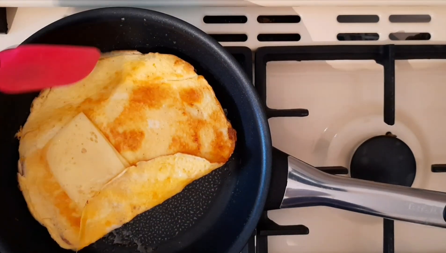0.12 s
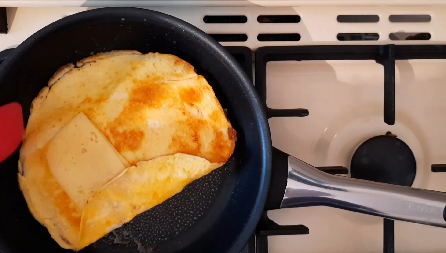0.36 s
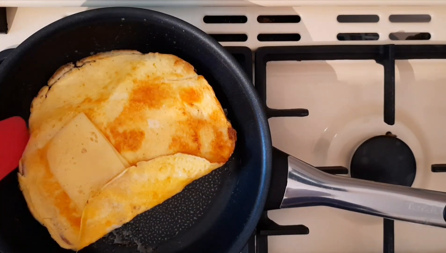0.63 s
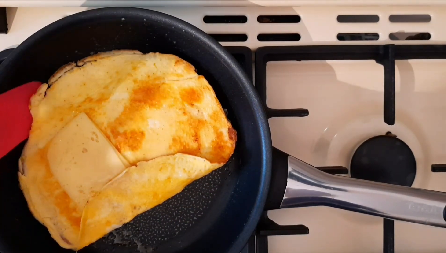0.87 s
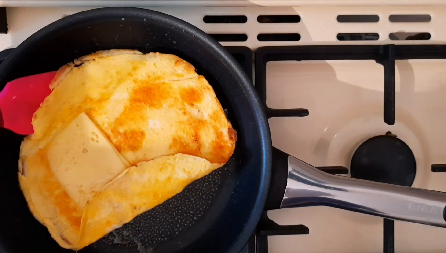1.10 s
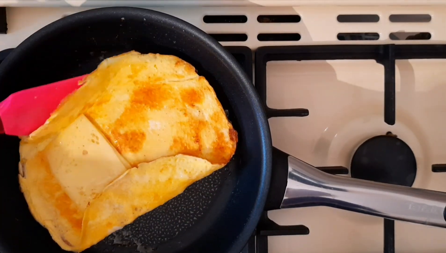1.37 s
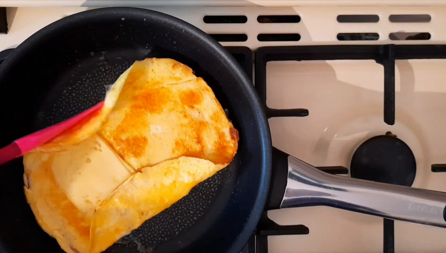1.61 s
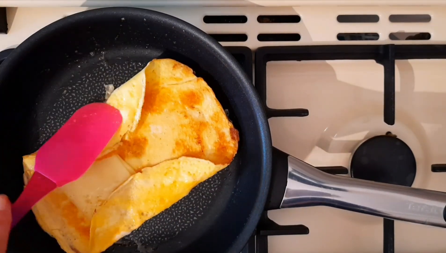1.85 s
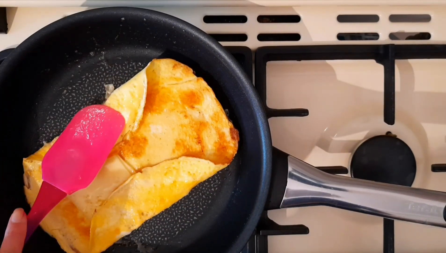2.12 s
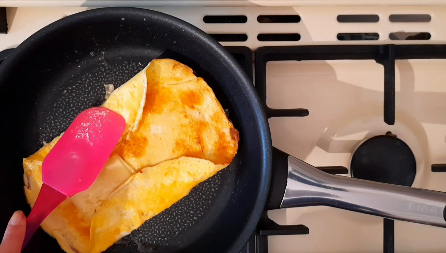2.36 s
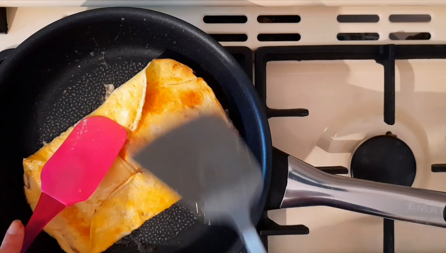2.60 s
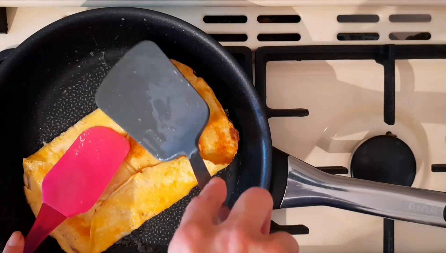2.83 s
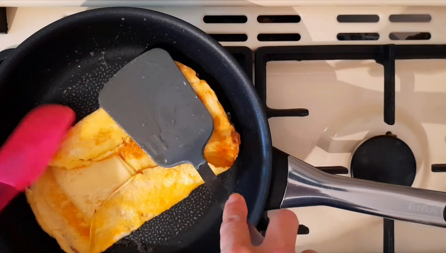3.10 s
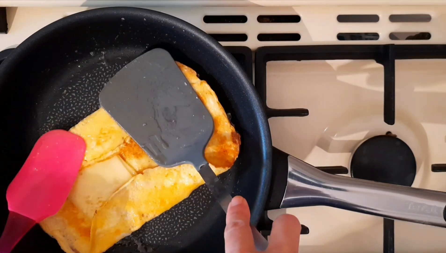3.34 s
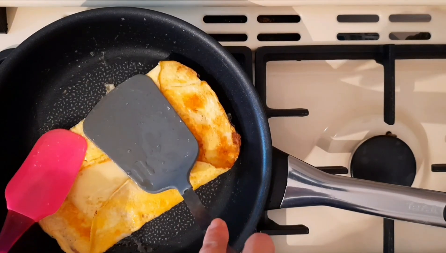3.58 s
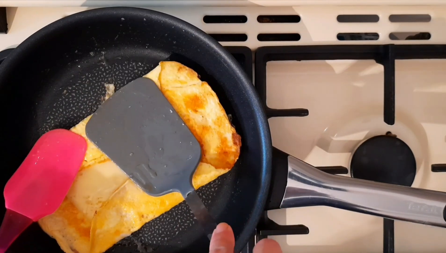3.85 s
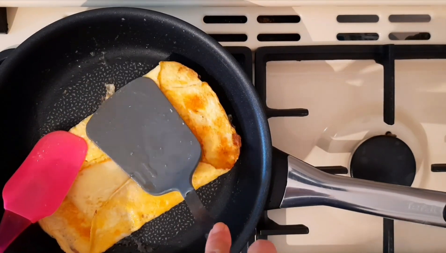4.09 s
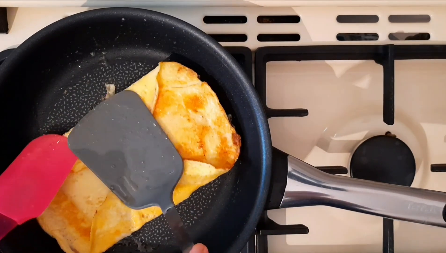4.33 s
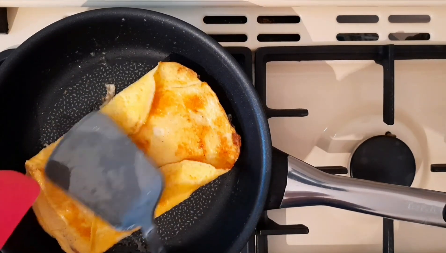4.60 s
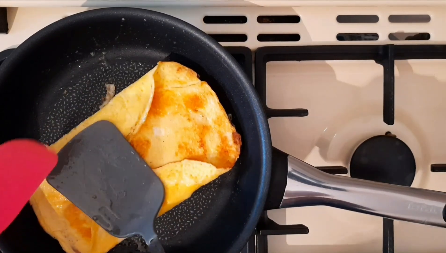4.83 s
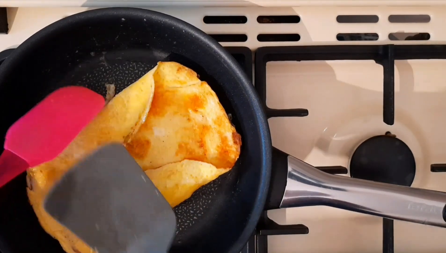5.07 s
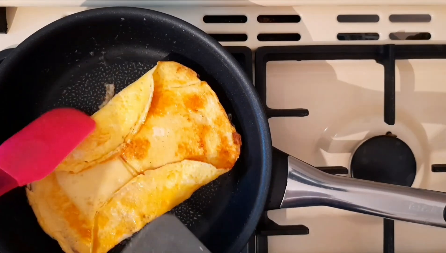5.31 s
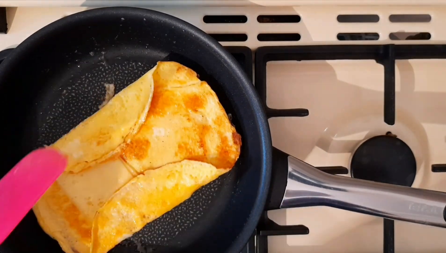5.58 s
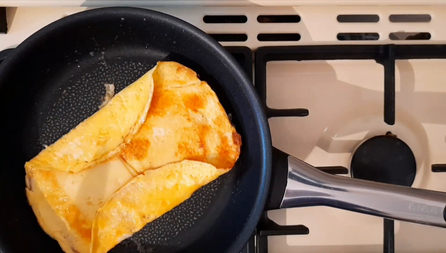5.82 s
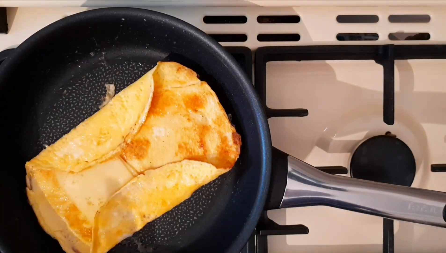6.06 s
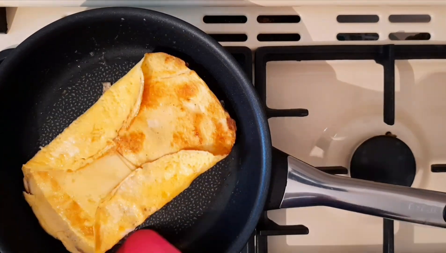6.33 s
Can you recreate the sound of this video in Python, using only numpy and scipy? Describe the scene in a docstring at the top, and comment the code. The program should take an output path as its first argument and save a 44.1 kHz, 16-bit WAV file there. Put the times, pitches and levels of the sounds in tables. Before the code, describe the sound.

Close from above, egg bread fries faintly in a nonstick pan: fine high hiss, tiny crackles and sharp spits. A soft silicone spatula taps and drags dully. Just after two seconds a hard utensil clatters on the stove and strikes the pan rim, which rings briefly. Sizzle and pops continue, slightly stronger, until a second, duller clatter and short bright scrapes near the end. Hard small kitchen, soft low hush, thin high whine.

```python
"""A faint sizzle comes first, with sharp fat spits and soft spatula taps: egg bread in a nonstick pan.
Filtered noise and tiny damped sines make the sizzle; each spit is a damped sine trailed by weaker droplets.
Utensils tick, scrape and clatter as noise contacts that drive damped modes of tool, pan and stove body.
A thin high whine (a drifting sine) and a soft room hush (low noise) lie under it all.
It is heard from above by two close microphone ports in a hard kitchen."""
import sys
import numpy as np
from scipy import signal
from scipy.fft import rfft, irfft, next_fast_len
from scipy.io import wavfile
from scipy.ndimage import map_coordinates

SR = 44100
rng = np.random.default_rng(int(sys.argv[2]) if len(sys.argv) > 2 else 0)


def ratio_of_db(decibels):
    """Turn decibels (scalar or array-like) into linear amplitude factors; 0 dB maps to 1."""
    return 10 ** (np.asarray(decibels, float) / 20)


def unload_audio(sound):
    """Save the sound as a 16-bit wav file, at the path given as the first command line argument."""
    columns = np.transpose(np.atleast_2d(sound))
    # keep every value between -1 and 1, then stretch to whole-number steps
    steps = np.round(np.clip(columns, -1, 1) * 32767)
    wavfile.write(sys.argv[1], SR, steps.astype(np.int16))


N = 284004  # samples


def unit(x):
    """Scaled to rms 1."""
    return x / np.sqrt(np.mean(x ** 2) + 1e-20)


def along(points, hz):
    """Reads (Hz, value) points on a log frequency axis."""
    f, v = np.transpose(points)
    return np.interp(np.log(hz + 1), np.log(f + 1), v)


def curves(rows):
    """One value per sample for each column after the time."""
    s, *cols = np.transpose(rows)
    return [np.interp(np.arange(N) / SR, s, c) for c in cols]


def wobble(rate):
    """A smooth random curve with rate knots a second, updated every 64 samples."""
    knots = rng.standard_normal(int(N * rate / SR) + 4)
    coarse = map_coordinates(knots, [np.arange(0, N, 64) * rate / SR])
    return np.repeat(coarse, 64)[:N]


def filtered(x, response):
    """x shaped by a complex response of frequency."""
    n = x.shape[-1]
    m = next_fast_len(n + 4096)
    return irfft(rfft(x, m) * response(np.fft.rfftfreq(m, 1 / SR)), m)[..., :n]


def coloured(n, spectrum):
    """Noise of rms 1 with the given spectrum."""
    return unit(filtered(rng.standard_normal(n), lambda hz: ratio_of_db(along(spectrum, hz))))


def ports(x, lag_ms, pan_db):
    """The left port hears lag_ms later and pan_db louder than the right."""
    sides = np.array([[.5], [-.5]])
    return filtered(x, lambda hz: ratio_of_db(sides * pan_db) * np.exp(-2j * np.pi * hz * sides * lag_ms / 1000))


def mid_side_shares(alike, hz):
    """Mid and side strengths that give two ports the wanted likeness."""
    turn = np.arccos(np.clip(along(alike, hz), 0, 1)) / 2
    return np.array([np.cos(turn), np.sin(turn)])


def paired(pair, alike):
    """Two unrelated noises mixed to the given left-right likeness."""
    mid, side = filtered(pair, lambda hz: mid_side_shares(alike, hz))
    return np.array([mid + side, mid - side])


# left-right likeness of diffuse noise: pitch_hz [Hz], likeness [0-1]
NOISE_LIKENESS = [(60, 0.8), (200, 0.13), (800, 0.81), (2500, 0.01), (6000, 0), (13000, 0.11)]


def stereo_noise(spectrum):
    """Diffuse noise of rms 1, partly alike at the two ports."""
    def shape(hz):
        """Mid and side shares of the spectrum."""
        return ratio_of_db(along(spectrum, hz)) * mid_side_shares(NOISE_LIKENESS, hz)
    mid, side = filtered(rng.standard_normal((2, N)), shape)
    return unit(np.array([mid + side, mid - side]))


# left-right likeness of the echoes: pitch_hz [Hz], likeness [0-1]
ECHO_LIKENESS = [(150, 0.98), (500, 0.77), (1500, 0.029), (5000, 0.2)]
# kitchen decay: pitch_hz [Hz], t60_s [s]
KITCHEN_DECAY = [(100, 0.29), (500, 0.37), (2000, 0.34), (4000, 0.28), (14000, 0.32)]


def kitchen(x, room_db):
    """A fresh echo tail of the kitchen, each frequency dying at its own speed."""
    noise = paired(rng.standard_normal((2, round(.33 * SR))), ECHO_LIKENESS)
    hz, t, bins = signal.stft(noise, SR, nperseg=256)
    decay = ratio_of_db(-60 * t / along(KITCHEN_DECAY, hz)[:, None])
    tail = signal.istft(bins * decay, SR, nperseg=256)[1]
    tail = tail / np.linalg.norm(tail[0])
    tail = np.pad(tail, ((0, 0), (round(.005 * SR), 0)))  # the first wall answers after 5 ms
    return ratio_of_db(room_db) * signal.oaconvolve(x[None], tail, axes=1)[:, :len(x)]


def heard(sound, lag_ms, pan_db, room_db):
    """Direct sound at the two ports plus its echoes."""
    return ports(sound, lag_ms, pan_db) + kitchen(sound, room_db)


def ringing(modes, t, scatter_db):
    """Damped modes, neighbours in opposite phase, struck at new strengths each time."""
    hz, db, t60 = np.transpose(modes)[:, :, None]
    chance = rng.standard_normal((len(modes), 1))
    sign = (-1.0) ** np.arange(len(modes))[:, None]
    level = ratio_of_db(db + scatter_db * chance - 60 * t / t60)
    return (sign * level * np.sin(2 * np.pi * hz * t)).sum(0)


def bursts(s, size, hz, cycles):
    """Bubbles bursting: a short damped sine each, falling to 1/e in so many cycles."""
    k = np.arange(96)  # samples in a burst
    phase = hz[:, None] * k / SR
    shapes = size[:, None] * np.exp(-phase / cycles) * np.sin(2 * np.pi * phase)
    places = (s * SR).astype(int)[:, None] + k
    return np.bincount(places.ravel(), shapes.ravel(), N + 200)[:N]


# high whine, drifting: start_s [s], pitch_hz [Hz], level_db [dB, before unsteadiness and pan]
WHINE_DRIFT = [(0, 13468, -67), (1.3, 13489, -70), (2.0, 13484, -71), (2.9, 13460, -71), (3.3, 13445, -65),
               (3.7, 13460, -76), (4.2, 13468, -73), (4.9, 13478, -70), (6.44, 13482, -69)]


def whine():
    """A thin high sine, slightly fuzzy in pitch and unsteady in strength, a little to the left."""
    hz, db = curves(WHINE_DRIFT)
    tone = np.sin(2 * np.pi * np.cumsum(hz + 12 * wobble(64)) / SR)
    level = np.sqrt(2) * ratio_of_db(db + 2.0 * wobble(5) + 1.4 * wobble(24))
    return level * tone * ratio_of_db([[1.2], [-1.2]])


# sizzle and hush level; the rises near 2.6 and 6.2 s are wash left ringing after the clatter:
# start_s [s], level_db [sizzle dB, before flutter and pan]
WASH_LEVEL = [(0, -62.5), (.2, -62), (.58, -58.5), (1.1, -61), (1.9, -62), (2.6, -55.5), (2.9, -61),
              (3.14, -58.5), (3.4, -58), (3.65, -55.5), (4.2, -56.5), (4.4, -58.5), (4.8, -58.5),
              (5.3, -61.5), (5.8, -60.5), (6.2, -55.5), (6.44, -61)]
# hush colour: pitch_hz [Hz], level_db [relative dB per Hz]
HUSH_COLOUR = [(18, -34), (30, -2), (55, 3), (142, 0), (220, -13.5), (296, -4), (334, -9), (369, -8.5),
               (459, -12.5), (670, -4.5), (1040, -11.5), (1610, -13), (1740, -2), (2090, -12.5),
               (3500, -15.5), (4550, -61.5), (7700, -120)]
HUSH_DB, HUSH_GROWS = -67, 1.18  # level at the average of the curve; dB of hush for each dB of sizzle


def hush():
    """Soft low noise that swells along the same level curve as the sizzle."""
    wash_db, = curves(WASH_LEVEL)
    swell_db = HUSH_GROWS * (wash_db - wash_db.mean())
    return ratio_of_db(HUSH_DB + swell_db + 0.082 * wobble(14)) * stereo_noise(HUSH_COLOUR)


# steam hiss colour: pitch_hz [Hz], level_db [relative dB per Hz]
SIZZLE_COLOUR = [(1470, -63), (2500, -48), (3160, -6), (3980, -2), (5920, 0), (10600, -1), (12700, 5),
                 (13000, -1), (13900, 5), (15600, -2), (16000, -65)]


def sizzle():
    """A fine hiss of steam with thousands of small bubbles; both follow one level curve."""
    draws = rng.random((3000, 3))  # moment, size and pitch of each bubble
    sizes = ratio_of_db(-2.0 * np.log(1 - draws[:, 1]))
    bubbles = unit(bursts(draws[:, 0] * N / SR, sizes, 6000 + 8500 * draws[:, 2], cycles=1.1))
    flutter = ratio_of_db(0.061 * wobble(4.5) + 1.78 * wobble(25))
    return ratio_of_db(curves(WASH_LEVEL)[0]) * flutter * (stereo_noise(SIZZLE_COLOUR) + ratio_of_db(-10.5) * bubbles)


FAINT_SPITS, FAINT_DB, FAINT_SPREAD_DB = 40, -44, 1.5  # count; least level at an average moment; random excess
FAINT_HZ = 11000  # scaled by 0.7 to 0.95 at random


def faint_spits():
    """Small spits at random moments, stronger where the level curve of the sizzle is higher."""
    s, size, pitch = rng.random((FAINT_SPITS, 3)).T
    s = s * (N - 1) / SR
    wash_db = np.interp(s, *np.transpose(WASH_LEVEL))
    db = FAINT_DB + wash_db - wash_db.mean() - FAINT_SPREAD_DB * np.log(1 - .9 * size)
    return np.transpose([s, db, FAINT_HZ * (0.7 + .25 * pitch)])


# loud fat spits: start_s [s], level_db [dB, before low cut and pan],
# pitch_hz [Hz, nominal: each pop takes 0.8 to 1.1 of it]
LOUD_SPITS = [(0.0503, -22, 7050), (0.0534, -21.5, 11200), (0.1615, -28.5, 11100), (0.5823, -26, 9250),
              (0.625, -30.5, 10000), (1.0969, -34, 12800), (2.0035, -30, 11300), (2.1796, -28.5, 10500),
              (2.1876, -31, 10700), (2.6504, -50, 12500), (2.8397, -34, 11400), (2.8863, -26, 13000),
              (3.0532, -28.5, 11800), (3.081, -23.5, 12400), (3.6147, -26, 12600), (3.8901, -17, 13200),
              (3.9062, -37, 11300), (4.6873, -30, 9100), (4.78, -37, 7000), (4.897, -34.5, 7000),
              (5.036, -33, 8040), (5.048, -35, 9100), (5.07, -40, 7500)]
SPIT_CUT_HZ = 2600  # a spit has little body below this


def spits():
    """Each spit is a sharp pop trailed by a few weaker droplets."""
    rows = np.vstack([LOUD_SPITS, faint_spits()])
    s, db, hz = np.transpose(rows)[:, :, None]
    draws = rng.random((len(rows), 2, 5))
    late = 0.012 * draws[:, 0] * (np.arange(5) > 0)  # seconds; the first pop is on time
    pitch = np.clip(hz * (0.8 + 0.3 * draws[:, 1]), 3000, 14000)
    start = np.minimum(s + late, (N - 1) / SR)
    size = ratio_of_db(db - 1500 * late)  # later droplets are weaker
    pops = bursts(start.ravel(), size.ravel(), pitch.ravel(), cycles=0.62)
    pops = filtered(pops, lambda f: (1j * f / (SPIT_CUT_HZ + 1j * f)) ** 2)
    return heard(pops, lag_ms=-0.206, pan_db=8.5, room_db=-6.5)


# soft spatula drags: start_s [s], end_s [s], dull_db [dB], brush_db [dB] (before fade, lumps and pan)
DRAGS = [(0.022, 0.17, -68, -105), (0.36, 0.444, -63, -84), (0.534, 0.725, -70, -69),
         (0.754, 0.95, -72, -63), (0.944, 1.09, -73, -67), (1.145, 1.332, -56.5, -100),
         (2.164, 2.3, -52.5, -44), (3.622, 3.74, -68.5, -66), (4.578, 4.697, -69.5, -72),
         (5.816, 5.97, -51.5, -76)]
# dull drag colour: pitch_hz [Hz], level_db [relative dB per Hz]
DRAG_COLOUR = [(59, -74), (100, -7), (192, 2), (245, -19), (295, 3), (514, -10), (908, 3), (1020, -38),
               (1330, -9), (3000, -28), (3900, -47.5), (6600, -120)]
# brighter brushing colour: pitch_hz [Hz], level_db [relative dB per Hz]
BRUSH_COLOUR = [(500, -38), (1000, -4.5), (1900, 4.5), (2800, 2), (3600, -2), (6000, -61)]
RUB_FADE_DB_PER_S = 30  # a drag loses pressure as it goes


def rubs():
    """The soft spatula drags along the pan: a dull, lumpy rush that starts fast, under a swelling brush."""
    t = np.arange(N) / SR
    shapes, swells = [], []
    for s, end, *_ in DRAGS:
        edges = np.clip(np.minimum((t - s) / 0.02, (end - t) / 0.033), 0, 1)  # stops when it lifts
        shapes.append(edges * ratio_of_db(-RUB_FADE_DB_PER_S * np.clip(t - s, 0, 1)))
        swells.append(np.sin(np.pi * np.clip((t - s) / (end - s), 0, 1) ** 0.83) ** 2)
    dull_db, brush_db = np.transpose(DRAGS)[2:]
    dull = ratio_of_db(dull_db) @ np.array(shapes) * ratio_of_db(2.4 * wobble(70)) * coloured(N, DRAG_COLOUR)
    lumps = ratio_of_db(2.3 * wobble(12) + 3.5 * wobble(90))
    return dull + ratio_of_db(brush_db) @ np.array(swells) * lumps * coloured(N, BRUSH_COLOUR)


# utensil modes: pitch_hz [Hz], level_db [relative dB, before scatter], t60_s [s]
TOOL_MODES = [(975, -9, .04), (1080, -3, 0.05), (1310, -3, 0.09), (1470, -3, .07), (1680, -7, .06),
              (1830, -9, .05), (2080, -6, .06), (2270, -5, 0.05), (2410, -1, 0.09), (2550, -7, .06),
              (2920, -8, .07), (3470, -3, 0.08), (3880, -2, 0.09), (4300, -7, .03), (4980, -5, 0.06),
              (5290, -4.5, 0.075), (5680, -10, .04), (6020, -9, 0.05), (6350, -8, .04), (6690, -10, .05),
              (7150, -7, .05), (7640, -7, 0.05), (8500, -7, 0.05), (9090, -8, .05), (9790, -8, .05),
              (10900, -5, .05)]
RING_OCTAVES, RING_CHATTER = 0.8, 0.69  # reach of a blow around its centre; re-excitation by the chatter


def struck(t, centre_hz, chatter):
    """The utensil's modes near the blow's centre, struck once and kept going by the chatter."""
    modes = []
    for hz, db, t60 in TOOL_MODES:
        distance = np.log2(hz / centre_hz) / RING_OCTAVES
        modes.append((hz, db - 6 * distance ** 2, t60))
    push = RING_CHATTER * chatter / np.linalg.norm(chatter)
    push[0] = 1
    return signal.oaconvolve(push, ringing(modes, t, scatter_db=2.0))[:len(t)]


# knock colour: pitch_hz [Hz], level_db [relative dB per Hz]
KNOCK_COLOUR = [(250, -6), (450, -8.5), (800, -5), (1300, -5), (2000, -8), (2600, -16), (3100, -19.5),
                (5000, -18), (8000, -48)]
# stove body modes: pitch_hz [Hz], level_db [relative dB, before tilt and scatter], t60_s [s]
STOVE_MODES = [(101, -6, 0.24), (144, 2.5, 0.15), (184, 1.5, 0.14), (206, -5, .11), (255, -6, .08),
               (326, -10, 0.09), (405, 1, 0.13)]
SNAP_DB, SNAP_S = -3.5, .00006  # the first instant of a contact, over the knock; its time constant
RATTLE_DB, RATTLE_PER_S = 3.5, 260  # a contact chatters instead of dying smoothly
THUD_RISE_S, CONTACT_RISE_S = .005, .0007


def clatter(blows, clinks, tilt_db):
    """Each blow clinks at the contact, knocks, booms in the stove and rings the utensil."""
    out = np.zeros(N + SR)
    t = np.arange(round(.25 * SR)) / SR
    knocks = coloured(N, KNOCK_COLOUR)
    # some spots stir the lowest modes less: tilt_db per octave below 190 Hz
    stove = [(hz, db + tilt_db * np.log2(min(hz, 190) / 190), t60) for hz, db, t60 in STOVE_MODES]
    snap = t / SNAP_S * (t / SNAP_S - 2) * np.exp(1 - t / SNAP_S)
    rattle = unit(ratio_of_db(RATTLE_DB * wobble(RATTLE_PER_S)))
    for s, clink_db, knock_db, thud_db, t60, ring_db, centre_hz in blows:
        at = slice(round(s * SR), round(s * SR) + len(t))
        chatter = rattle[at] ** (1 - np.exp(-t / 0.0062))  # sets in after the first milliseconds
        dying = chatter * ratio_of_db(-60 * t / max(t60, .005)) * (1 - np.exp(-t / CONTACT_RISE_S))
        contact = dying * (ratio_of_db(clink_db) * clinks[at] + ratio_of_db(knock_db) * knocks[at])
        contact = contact + ratio_of_db(knock_db + SNAP_DB) * snap
        thud = ratio_of_db(thud_db) * ringing(stove, t, scatter_db=2.0) * (1 - np.exp(-t / THUD_RISE_S))
        ring = ratio_of_db(ring_db) * struck(t, centre_hz, dying * rng.standard_normal(len(t)))
        out[at] += contact + thud + ring
    return out[:N]


# light taps of the soft spatula in the pan, close by (levels before chatter and pan):
# start_s [s], knock_db [dB], thud_db [dB]
SPATULA_TAPS = [(0.053, -41.5, -64), (0.058, -36.5, -75), (0.3752, -53, -60), (0.7794, -56, -84),
                (0.832, -74, -90), (1.0065, -58, -83), (1.028, -55, -86), (1.156, -37.5, -72),
                (1.168, -43, -66), (3.647, -47, -67.5), (4.589, -57, -64)]
TAP_CLINK_DB, TAP_T60_S = -4.5, 0.021  # clink relative to the knock; contact decay
TAP_RING_DB, TAP_RING_HZ = -15, 1110  # ring relative to the knock; its centre


def taps(clinks):
    """Soft taps share one contact: little clink, quickly over, little echo."""
    rows = [(s, db + TAP_CLINK_DB, db, thud_db, TAP_T60_S, db + TAP_RING_DB, TAP_RING_HZ)
            for s, db, thud_db in SPATULA_TAPS]
    return heard(clatter(rows, clinks, tilt_db=2), lag_ms=-0.13, pan_db=4.5, room_db=-8.0)


# steel edge scrapes: middle_s [s], level_db [dB, before brightening and pan], length_s [s]
EDGE_SCRAPES = [(6.127, -26.5, 0.017), (6.441, -26.5, 0.023)]


def scrape(clinks):
    """A steel edge skids over the pan: a bright rasp that swells, fades and excites the utensil's modes."""
    t = np.arange(N) / SR
    stroke = 0
    for s, db, length in EDGE_SCRAPES:
        stroke = stroke + ratio_of_db(db) * np.cos(np.pi * np.clip((t - s) / length, -.5, .5)) ** 2
    rasp = stroke * filtered(clinks, lambda hz: (hz / 6000) ** 0.14)  # skidding is brighter than a blow
    modes = ringing(TOOL_MODES, t[:round(.25 * SR)], scatter_db=1)
    both = rasp + ratio_of_db(-53.5) * signal.oaconvolve(rasp, modes)[:N]
    return heard(both, lag_ms=-0.14, pan_db=6.5, room_db=-12.0)


# the blow on the pan rim: start_s [s], level_db [dB, before the mode levels]
RIM_BLOW = [(2.4005, -22.5)]
# pan modes: pitch_hz [Hz], level_db [relative dB, before scatter], t60_s [s, before the extra damping]
PAN_MODES = [(661, -9, 0.98), (1061, -13, 0.3), (1135, -14, .3), (1184, -19, .3), (1305, -14, 0.25),
             (1435, -19, 0.3), (2047, -12, 0.45), (2196, -18, .3), (2300, -17, 0.3), (2880, -10, 0.36),
             (3433, -13, 0.22), (3472, -17, .18), (3881, -13, 0.32), (4978, -13.5, 0.22), (5280, -17, 0.22),
             (6013, -23, .2), (6250, -16, 0.15), (7160, -24, .18), (7641, -19, 0.12), (8516, -25, .15),
             (9076, -25, .14)]
# each pan mode radiates its own way: pitch_hz [Hz], left_over_right_db [dB]
PAN_RADIATION = [(661, -4), (1100, 1), (2047, 3), (2880, 9), (3450, 3), (3881, -16), (4978, -12), (5280, 0),
                 (6250, -4), (7641, 6)]
DAMPED_AFTER_S, DAMPING_DB_PER_S = .46, 60  # then something touches the pan and stills it


def pan_ring():
    """One hard blow on the rim sets the whole pan ringing in damped modes."""
    (s, db), = RIM_BLOW
    t = np.arange(SR) / SR
    ring = ratio_of_db(db) * ringing(PAN_MODES, t, scatter_db=2.5) * (1 - np.exp(-t / 0.0033))
    ring = ring * ratio_of_db(-DAMPING_DB_PER_S * np.maximum(t - DAMPED_AFTER_S, 0))
    sides = np.array([[.5], [-.5]])
    direct = filtered(ring, lambda hz: ratio_of_db(sides * along(PAN_RADIATION, hz)))
    both = direct + kitchen(ring, room_db=-15)
    return np.pad(both, ((0, 0), (round(s * SR), N)))[:, :N]


# hard utensil blows on the stove top (levels before chatter, scatter and pan): start_s [s], clink_db [dB],
# knock_db [dB], thud_db [dB], contact_t60_s [s], ring_db [dB], ring_centre_hz [Hz]
STOVE_BLOWS = [(2.1835, -52, -47, -44, 0.37, -46.5, 2260), (2.2502, -20.5, -18.5, -38, 0.072, -30.5, 4300),
               (2.2564, -25.5, -21, -31, 0.01, -22, 1130), (2.2676, -33, -39, -40.5, 0.012, -47, 1280),
               (2.2784, -28, -41, -62, 0.068, -29, 4760), (2.319, -32.5, -31, -34, 0.067, -36.5, 5600),
               (2.344, -54, -26, -28, 0.12, -31, 2260), (2.4004, -33, -23.5, -34, 0.063, -44, 3850),
               (2.4156, -36, -24, -57, 0.037, -38, 3470), (2.4649, -45, -29, -31.5, 0.039, -35, 1480),
               (2.47, -52, -39, -46, 0.09, -53, 2450), (2.49, -49, -28, -38.5, 0.026, -47, 2510),
               (2.508, -52, -24, -38, 0.014, -51, 2980), (2.5377, -60.5, -38, -49, 0.014, -80, 2000),
               (5.825, -36, -51.5, -41.5, 0.024, -38.5, 3050),
               (5.9005, -46.5, -43.5, -42.5, 0.092, -42.5, 3220),
               (5.953, -40, -14.5, -28.5, 0.017, -27, 1430), (5.969, -53, -27, -45, 0.016, -40, 1540),
               (5.99, -48, -29.5, -34, 0.057, -46, 1530), (6.015, -60, -33, -48, 0.025, -43, 1910),
               (6.0404, -66, -37, -33.5, 0.031, -42, 1400), (6.1078, -22, -55, -40, 0.022, -34, 5000),
               (6.1263, -38, -34, -45, 0.023, -41.5, 3496)]
MOVES_LEFT_S = 4  # earlier blows land mid-stove, later ones by the left port


def blows(clinks):
    """Two bouts of clatter from two places on the stove, each with its own echoes."""
    middle = clatter([b for b in STOVE_BLOWS if b[0] < MOVES_LEFT_S], clinks, tilt_db=0)
    left = clatter([b for b in STOVE_BLOWS if b[0] >= MOVES_LEFT_S], clinks, tilt_db=6)
    middle = heard(middle, lag_ms=0.384, pan_db=1.9, room_db=-0.5)
    return middle + heard(left, lag_ms=-0.08, pan_db=2.5, room_db=-1.5)


# clink colour: pitch_hz [Hz], level_db [relative dB per Hz]
CLINK_COLOUR = [(1650, -9.5), (2800, -6.5), (3940, 1), (4630, -13.5), (5130, -1.5), (6720, -9.5),
                (12800, -8), (15500, -16.5), (16000, -61.5)]


def scene():
    """Everything at the stove; the pan lies nearer the left port."""
    clinks = coloured(N, CLINK_COLOUR)  # one bright noise serves every contact
    bed = ports(sizzle() + hush(), lag_ms=-0.187, pan_db=2.0)
    bed = bed + ports(rubs(), lag_ms=-0.13, pan_db=3.0)
    utensils = blows(clinks) + scrape(clinks) + taps(clinks)
    return bed + spits() + whine() + utensils + pan_ring()


def top_cut(x):
    """Nothing passes above the cut-off."""
    return signal.sosfilt(signal.butter(12, 15800, fs=SR, output="sos"), x)


def record(dry):
    """The microphones cut deep bass: two first-order low cuts at 65 Hz."""
    mix = filtered(dry, lambda hz: (1j * hz / (65 + 1j * hz)) ** 2)
    return top_cut(mix)


dry = scene()
out = record(dry)
unload_audio(out)
```